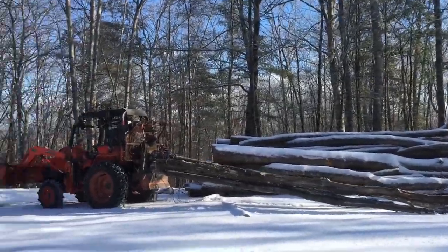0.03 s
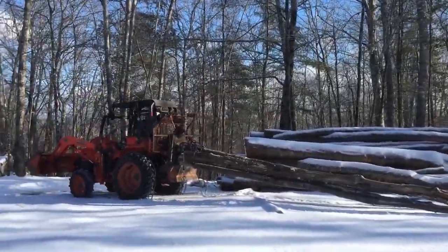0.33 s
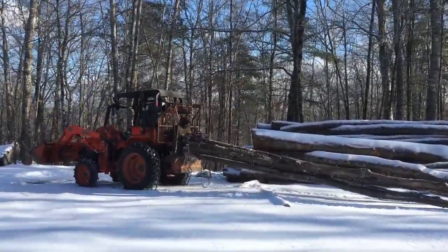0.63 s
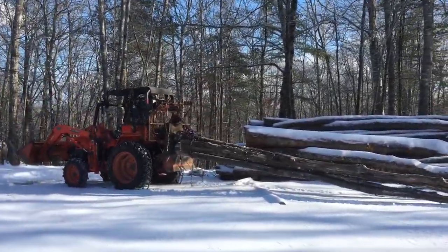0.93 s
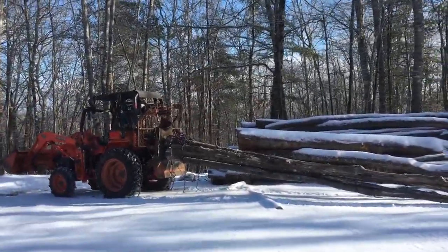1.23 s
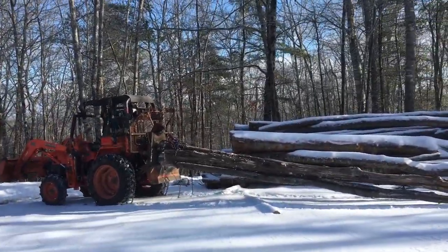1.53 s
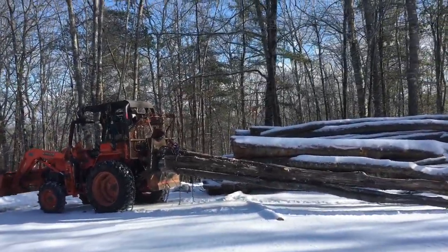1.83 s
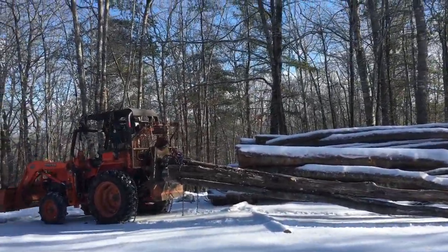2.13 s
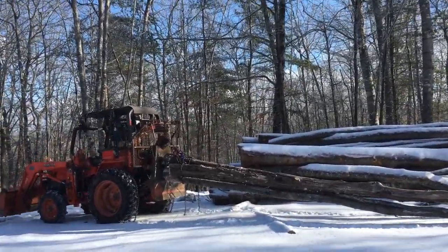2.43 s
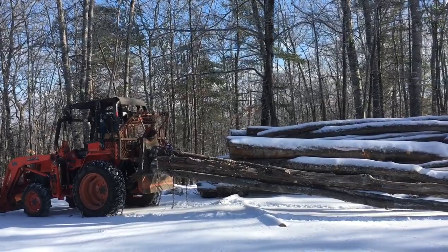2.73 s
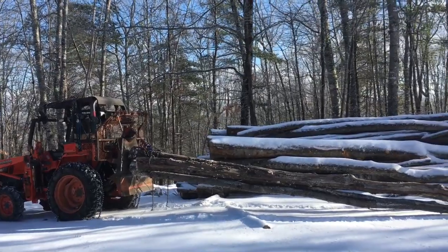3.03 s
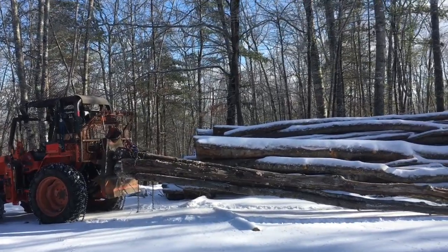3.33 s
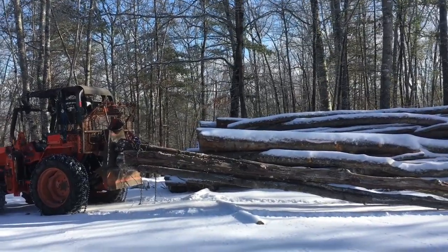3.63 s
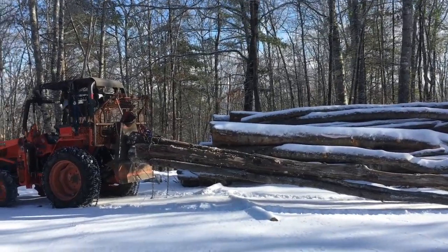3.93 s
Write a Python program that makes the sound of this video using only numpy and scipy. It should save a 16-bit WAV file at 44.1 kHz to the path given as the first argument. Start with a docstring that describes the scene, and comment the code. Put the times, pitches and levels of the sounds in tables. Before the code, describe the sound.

Close footsteps pack cold snow and break its crust, about one a second, with light scuffs and faint squeaks between them and softer steps at the end. A tractor engine rumbles steadily across the clearing under a soft outdoor hiss.

```python
"""Boots creak, thud and crunch through cold snow while a diesel tractor idles across a clearing.
Under each boot the snow packs with dull creaks and thuds, then the crust gives way in a bright crunch.
Lighter scuffs and a few thin squeaks fall between the steps, over a soft hiss.
The engine throbs and knocks throughout, as each firing puffs out of the exhaust and rings the block."""
import sys
import numpy as np
from scipy import signal
from scipy.fft import rfft, irfft
from scipy.io import wavfile
from scipy.ndimage import uniform_filter1d

SR = 44100
rng = np.random.default_rng(int(sys.argv[2]) if len(sys.argv) > 2 else 0)


def digitize_waveform(pressure):
    """Quantize a signal to 16-bit integers and store it at the path in sys.argv[1].

    Rows of a 2-D input are taken as channels; values are limited to [-1, 1].
    """
    field = np.atleast_2d(pressure).T
    bounded = np.clip(field, -1, 1)
    quanta = np.round(bounded * 32767).astype(np.int16)
    wavfile.write(sys.argv[1], SR, quanta)


N = 176400
TIME = np.arange(N) / SR

# the dull tone of creaking snow (pitch [Hz], relative level [dB])
CREAK_SPECTRUM = [(120, -12.5), (300, 5), (750, 4.5), (1200, -3), (3500, -12.5), (15000, -38)]


def from_db(db):
    """Turn decibels into a number to multiply by."""
    return 10 ** (np.asarray(db) / 20)


def rms_one(x):
    """Scale a sound so that its average strength (rms) is 1."""
    return x / np.sqrt(np.mean(x ** 2) + 1e-20)


def level(rows, column=1):
    """A volume curve through points in time and dB, silent before and after them."""
    rows = np.array(rows)
    return from_db(np.interp(TIME, rows[:, 0], rows[:, column], left=-np.inf, right=-np.inf))


def noise():
    """White noise: all pitches, equally strong."""
    return rng.standard_normal(N)


def colour(x, spectrum):
    """Make some pitches louder and others softer, then scale to strength 1."""
    hz, db = np.transpose(spectrum)
    freqs = np.maximum(np.arange(N // 2 + 1) * SR / N, 1)
    gain = from_db(np.interp(np.log(freqs), np.log(hz), db)) * np.minimum(freqs / hz[0], 1)
    # make the filter ring only after a click, never before it
    cepstrum = irfft(np.log(gain), N)
    cepstrum[1:N // 2] *= 2
    cepstrum[N // 2 + 1:] = 0
    return rms_one(irfft(rfft(x) * np.exp(rfft(cepstrum)), N))


def resonate(x, hz, width):
    """Keep one band of pitches, so the sound rings there."""
    r = np.exp(-np.pi * width / SR)
    feedback = [1, -2 * r * np.cos(2 * np.pi * hz / SR), r * r]
    return signal.lfilter(np.array([1, 0, -1]) * (1 - r * r) / 2, feedback, x)


def disperse(x, cycles):
    """Delay every pitch by the same number of its own cycles: a click becomes a falling chirp."""
    return irfft(rfft(x) * np.exp(-2j * np.pi * cycles * np.log1p(np.arange(N // 2 + 1))), N)


def drift(hz):
    """A smooth random wobble, mostly slower than hz."""
    freqs = np.arange(N // 2 + 1) * SR / N
    return rms_one(irfft(rfft(noise()) / (1 + (freqs / hz) ** 2) ** 2, N))


def grains(per_s, spread_db):
    """Tiny cracks: clicks of uneven size at random moments."""
    clicks = (rng.random(N) < per_s / SR) * np.sign(noise())
    return rms_one(clicks * from_db(spread_db * np.minimum(rng.exponential(1, N), 4)))


def burst(start, attack, hold, decay):
    """A volume curve that rises, then fades from `hold` after its start; all in seconds."""
    age = TIME - start
    return np.clip(age / attack, 0, 1) * np.exp(-np.clip((age - hold) / decay, 0, 20))


def hiss():
    """A soft hiss that slowly swells and fades."""
    # its loudness (time [s], level [dB])
    loudness = [(0, -38.5), (1.32, -54), (1.75, -46), (2.55, -53.5), (2.95, -45.5), (4, -49.5)]
    # its tone (pitch [Hz], relative level [dB])
    spectrum = [(500, -11), (1500, 23), (5000, 16), (15000, 13)]
    return level(loudness) * colour(noise(), spectrum)


def engine_knock(firings):
    """Each firing rings the engine block, some harder than others."""
    # how the block rings (pitch [Hz], width [Hz], level [dB], delay [firings])
    rings = [(1510, 150, -51, 0.02), (1690, 130, -47.5, .0), (2004, 70, -49.5, 0.04)]
    # the knock fades and swells (time [s], level change [dB])
    swell = [(0, 2.5), (1.2, -2.5), (1.35, 2.5), (4, 2.5)]
    attack, decay = .05, .38  # counted in firings
    knock = 0
    for hz, width, db, delay in rings:
        age = (firings - delay) % 1
        strength = from_db(1.7 * noise())[(firings - delay).astype(int)]
        hits = np.minimum(age / attack, 1) * np.exp(-(age / decay) ** 2) * strength
        ring = resonate(resonate(hits * noise(), hz, width), hz, width=400)
        knock = knock + from_db(db) * rms_one(ring)
    return knock * level(swell)


def tractor():
    """Each firing puffs through the exhaust and knocks on the block, over gritty machine noise."""
    # engine speed (time [s], rate [firings per second])
    speed = [(0, 25.6), (0.6, 27.4), (1.0, 28.1), (1.5, 26.75), (2.4, 26.69), (3.3, 25.91), (3.7, 26.56),
             (4, 28.42)]
    # exhaust hum (pitch [times the firing rate], level [dB])
    exhaust_tones = [(2, -42), (3, -35.5), (4, -48.5), (6, -43), (25, -58.5)]
    # exhaust rumble (pitch [Hz], relative level [dB])
    rumble_spectrum = [(38, 6), (58, 0.5), (110, 3.5), (240, -7.5), (420, -19.5), (900, -45.5)]
    # machine noise (pitch [Hz], relative level [dB])
    machine_spectrum = [(100, -5), (800, 6.5), (1250, 3.5), (3000, -3), (4200, -8.5), (7000, -11.5),
                        (12000, -8.5), (16000, -13.5)]
    first_knock_s = .0254
    rate = np.interp(TIME, *np.transpose(speed))
    firings = np.cumsum(rate) / SR - first_knock_s * speed[0][1] + 2  # goes up by 1 per firing
    hum = 0
    for multiple, db in exhaust_tones:
        strength = from_db(db + 3.14 * drift(hz=2.4)) * np.sqrt(2)
        hum = hum + strength * np.sin(2 * np.pi * (multiple * firings + rng.random()))
    throb = 1 + 0.62 * np.cos(2 * np.pi * (firings + 0.28))
    rumble = from_db(-34) * colour(noise(), rumble_spectrum) * throb
    knock = engine_knock(firings)
    fluttering_noise = noise() * from_db(2.22 * drift(hz=90))
    return hum + rumble + knock + from_db(-42) * colour(fluttering_noise, machine_spectrum)


def squeaks():
    """Faint, thin squeaks and clinks: noise ringing at one high pitch each."""
    # each squeak (time [s], level [dB], hold [s], pitch [Hz])
    events = [(.11, -47, .012, 11700), (.5, -54, .12, 9290), (0.641, -48.5, 0.068, 9330),
              (.652, -44, .016, 3250), (3.143, -47, 0.016, 5230), (3.272, -41, .008, 2700),
              (3.292, -41, .008, 3850), (3.385, -52, 0.032, 9350), (3.527, -52, 0.03, 9250)]
    out = 0
    for start, db, hold, hz in events:
        ring = rms_one(resonate(noise(), hz, width=70))
        out = out + from_db(db) * burst(start, attack=.006, hold=hold, decay=.013) * ring
    return out


def scuffs():
    """The swinging leg brushes lightly between steps."""
    # each scuff (time [s], level [dB], hold [s])
    events = [(0.816, -44, 0.12), (1.553, -34, 0.012), (2.599, -38.5, 0.025), (2.669, -35, 0.026),
              (3.708, -40.5, 0.019), (3.803, -38, 0.013)]
    # the tone of brushing (pitch [Hz], relative level [dB])
    spectrum = [(800, 9), (2000, 4.5), (3000, 13), (5500, 4.5), (8500, 2.5), (11000, 1), (16000, -46)]
    volume = sum(from_db(db) * burst(start, attack=.0014, hold=hold, decay=.013)
                 for start, db, hold in events)
    return colour(grains(per_s=4000, spread_db=2.0), spectrum) * volume


def thumps():
    """Low thumps that die almost at once: boots dropping onto firmer snow, and one dull engine knock."""
    # each thump (time [s], level [dB], pitch [Hz])
    events = [(0.137, -10.5, 89), (0.17, -5.5, 96), (0.202, -5.5, 71.4), (1.146, 0, 86), (1.941, -12.5, 68),
              (2.165, -21, 177), (2.716, -11.5, 118), (2.814, -7.5, 175), (2.952, -13.5, 102)]
    out = 0
    for start, db, hz in events:
        volume = from_db(db) * burst(start, attack=.00154, hold=.00154, decay=.0086)
        out = out + volume * np.sin(2 * np.pi * hz * (TIME - start))
    return out


def slips():
    """Snow slips as it packs, each time with a tiny, gritty, falling chirp."""
    # each slip (time [s], level [dB])
    events = [(.02, -24), (.071, -24), (.127, -18), (.279, -27), (.932, -26), (.96, -23), (.971, -25),
              (.987, -25), (.997, -18), (1.01, -20), (1.044, -24), (1.053, -20), (1.075, -24), (1.083, -17),
              (1.105, -19), (1.116, -18), (1.121, -18), (1.824, -24), (1.864, -22), (1.894, -26),
              (2.717, -19), (2.759, -25), (2.788, -26), (2.811, -18), (2.841, -22), (3.296, -24)]
    typical_start_hz, spread_octaves, glide_s = 1300, 0.3, .0018
    grit = .35 * colour(noise(), CREAK_SPECTRUM)
    out = 0
    for start, db in events:
        age = np.maximum(TIME - start, 0)
        start_hz = typical_start_hz * 2 ** (spread_octaves * rng.standard_normal())
        cycles = start_hz * glide_s * np.log1p(age / glide_s)
        volume = from_db(db) * burst(start, attack=.0004, hold=.0017, decay=.0017)
        out = out + volume * (np.sin(2 * np.pi * cycles) + grit)
    return out


def packing_snow():
    """Weight on the boot squeezes the snow, which creaks dully and thuds."""
    # one list of points per step (time [s], creak level [dB], thud level [dB])
    steps = [
        [(0, -42, -20.5), (.075, -32.5, -27), (.11, -56, -35), (.135, -35, -28.5), (.2, -34, -20.5),
         (.24, -44, -38), (.6, -46.5, -34.5)],
        [(.828, -39.5, -27), (.99, -44, -20.5), (1.12, -31.5, -26), (1.175, -26.5, -15.5), (1.22, -61, -56)],
        [(1.82, -32, -22.5), (1.87, -34.5, -22.5), (1.905, -35, -41), (1.925, -39, -12), (1.955, -47, -21),
         (2.02, -44, -39)],
        [(2.607, -38.5, -20.5), (2.71, -36.5, -27), (2.8, -39.5, -31), (2.835, -25, -14), (2.88, -52, -30),
         (2.9, -29.5, -17.5), (2.99, -37, -35)],
        [(3.208, -37, -47), (3.33, -39.5, -30.5)],
        [(3.705, -32.5, -30.5), (3.8, -53, -36.5), (3.89, -40, -35), (4, -52, -47)],
    ]
    # the deep tone of the thud (pitch [Hz], relative level [dB])
    thud_spectrum = [(40, -8), (120, 0), (220, -6), (450, -21), (1000, -47)]
    chirps = disperse(grains(per_s=260, spread_db=1.5), cycles=1.3)
    creak = colour(chirps, CREAK_SPECTRUM) * sum(level(step, column=1) for step in steps)
    thud = colour(grains(per_s=500, spread_db=2.5), thud_spectrum)
    thud_volume = sum(level(step, column=2) for step in steps)
    return creak + thud * uniform_filter1d(thud_volume, size=200)  # soften sudden edges


def breaking_crust():
    """The icy crust gives way in bright bursts of tiny cracks; longer breaks fade more slowly."""
    # each break (time [s], level [dB], hold [s], treble change [dB])
    breaks = [(.127, -16.5, 0.0042, -26), (.162, -17, 0.0011, 13), (0.165, -21.5, 0.021, -6),
              (1.135, -25, 0.0042, 5.5), (1.153, -18, 0.015, -1.5), (1.914, -18, 0.02, -2),
              (2.743, -19.5, 0.001, -2.5), (2.788, -33, 0.0018, 4), (2.8241, -7.5, 0.00068, 1.5),
              (2.853, -25, 0.0047, -8), (2.891, -19.5, 0.021, -3.5), (3.208, -27, 0.023, -30),
              (3.271, -32, 0.0055, -18), (3.287, -33.5, 0.016, -21)]
    # the tone of cracking ice (pitch [Hz], relative level [dB])
    spectrum = [(200, -27.5), (500, -0.5), (1300, -0.5), (2800, -3.5), (4200, -8), (6000, -7.5),
                (8000, -9.5), (16000, -6.5)]
    treble_from_hz = 3800
    ice = colour(grains(per_s=6500, spread_db=5), spectrum)
    body = signal.sosfilt(signal.butter(1, treble_from_hz, fs=SR, output="sos"), ice)
    treble = ice - body
    out = 0
    for start, db, hold, treble_db in breaks:
        volume = from_db(db) * burst(start, attack=.0007, hold=hold, decay=hold)
        out = out + volume * (body + from_db(treble_db) * treble)
    return out


def scene():
    """Footsteps close by, the tractor further off and a soft hiss, in one channel."""
    footsteps = packing_snow() + slips() + breaking_crust() + scuffs() + squeaks()
    return (footsteps + thumps() + tractor() + hiss())[None]


def record(dry):
    """The microphone rounds off peaks, weakens two pitches and loses the very lowest and highest."""
    # pitches the microphone weakens (pitch [Hz], width [Hz], depth [0-1])
    dips = [(4910, 240, 0.7), (10480, 420, 0.67)]
    peak_limit, low_cut_hz, high_cut_hz = 0.68, 46, 15750
    rounded = peak_limit * np.tanh(dry / peak_limit)
    sound = signal.sosfilt(signal.butter(4, low_cut_hz, "high", fs=SR, output="sos"), rounded)
    for hz, width, depth in dips:
        sound = sound - depth * resonate(sound, hz, width)
    return signal.sosfilt(signal.ellip(12, .1, 80, high_cut_hz, fs=SR, output="sos"), sound)


dry = scene()
out = record(dry)
digitize_waveform(out)
```